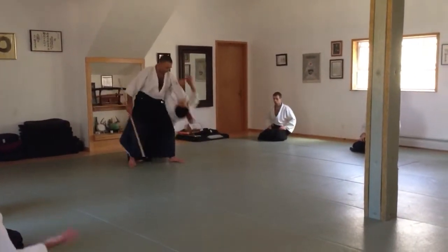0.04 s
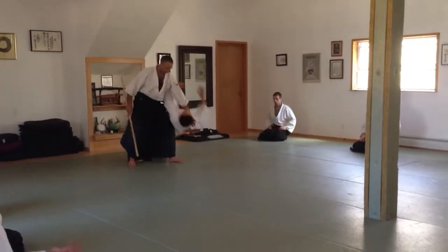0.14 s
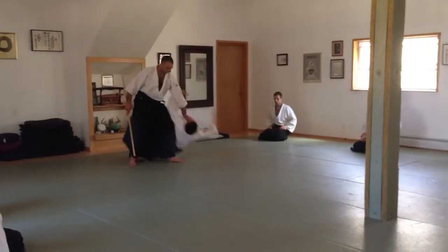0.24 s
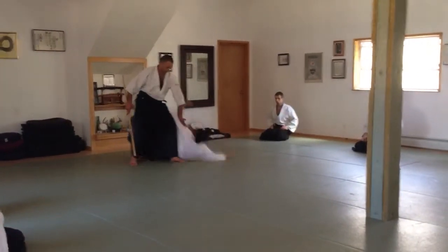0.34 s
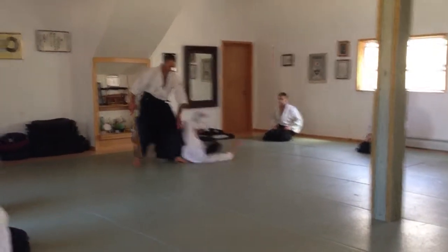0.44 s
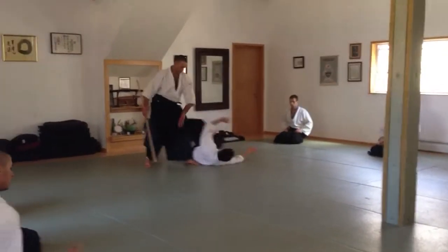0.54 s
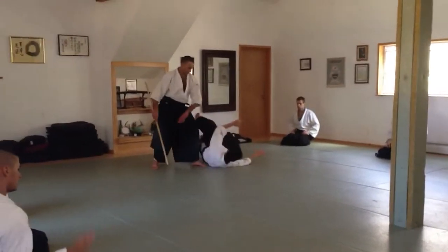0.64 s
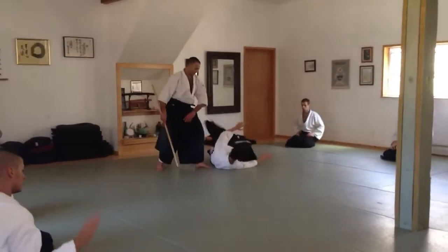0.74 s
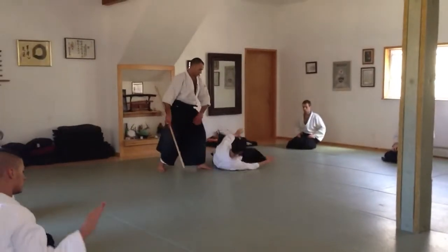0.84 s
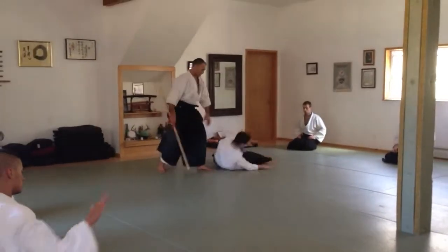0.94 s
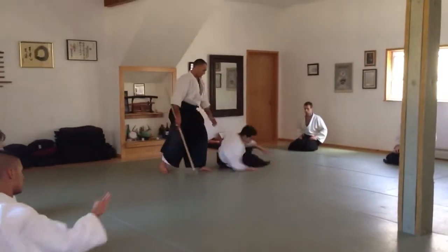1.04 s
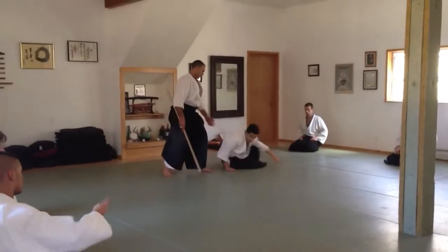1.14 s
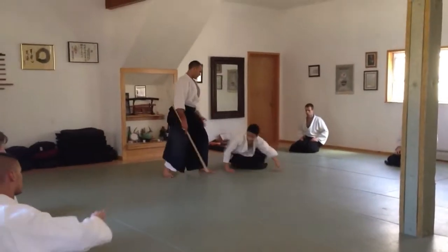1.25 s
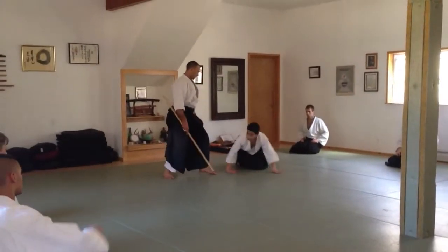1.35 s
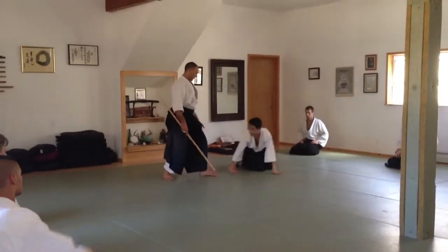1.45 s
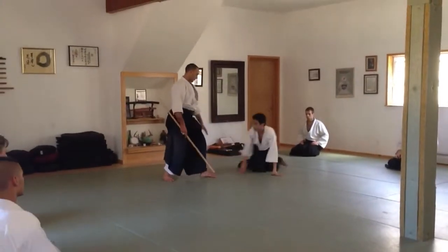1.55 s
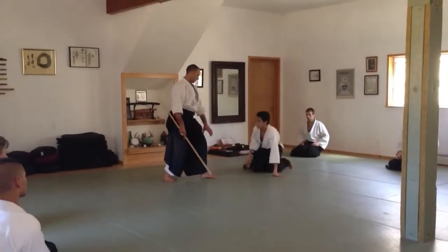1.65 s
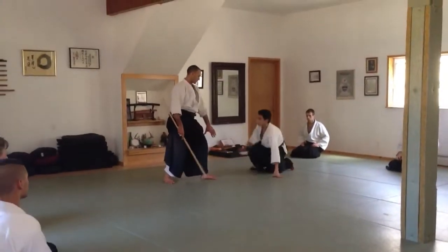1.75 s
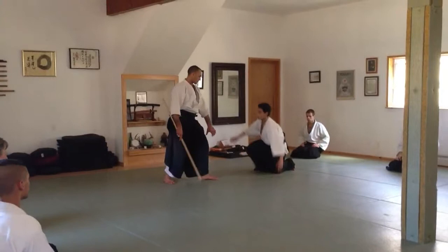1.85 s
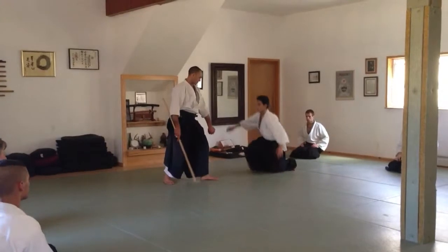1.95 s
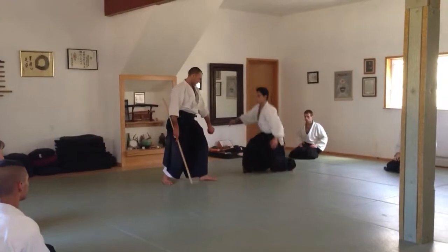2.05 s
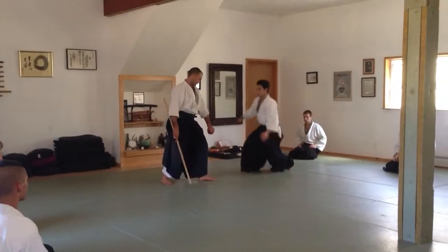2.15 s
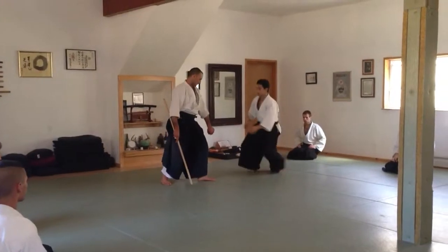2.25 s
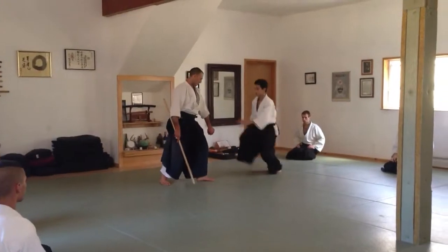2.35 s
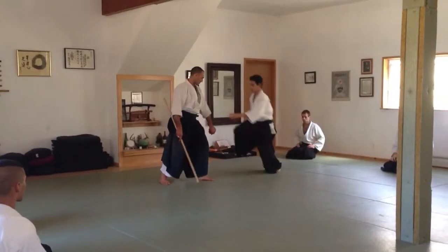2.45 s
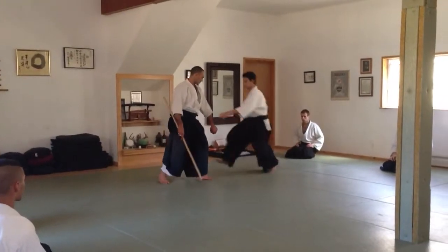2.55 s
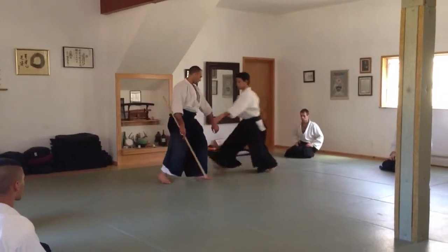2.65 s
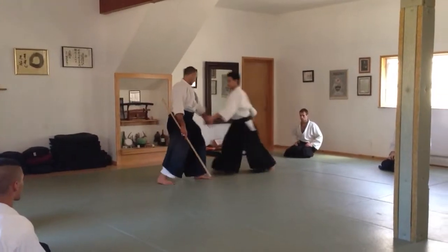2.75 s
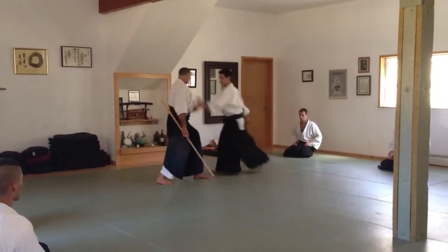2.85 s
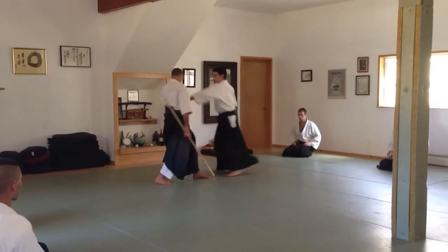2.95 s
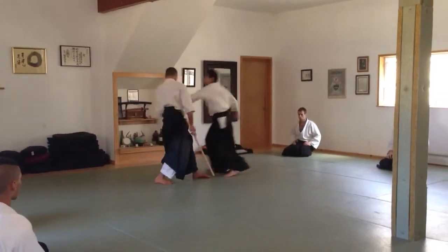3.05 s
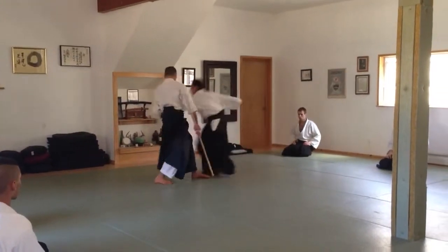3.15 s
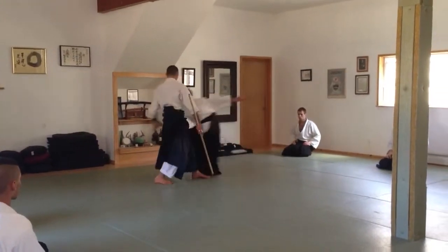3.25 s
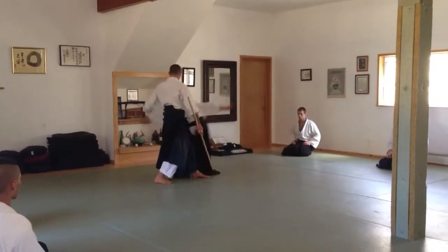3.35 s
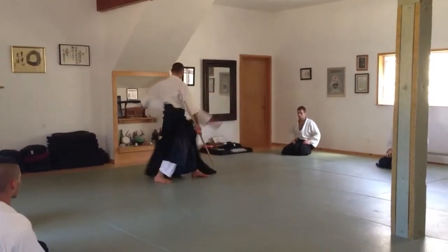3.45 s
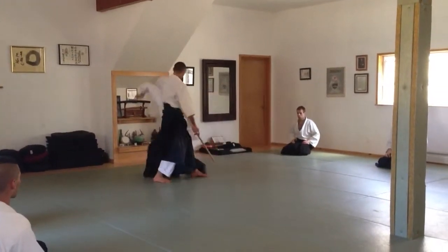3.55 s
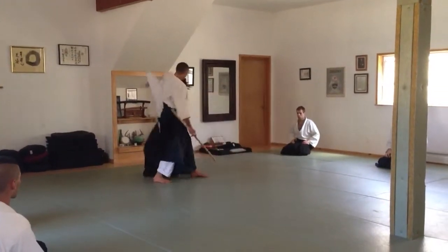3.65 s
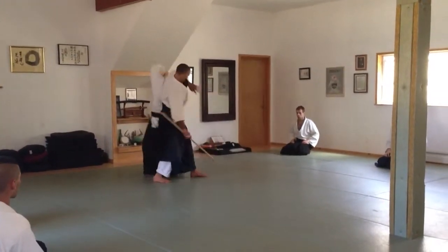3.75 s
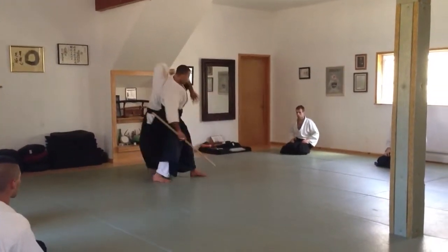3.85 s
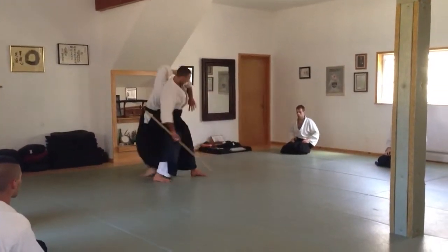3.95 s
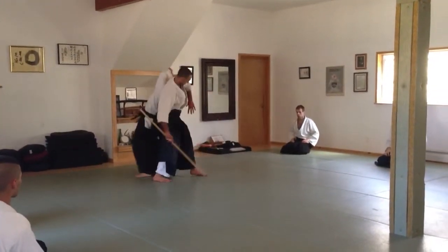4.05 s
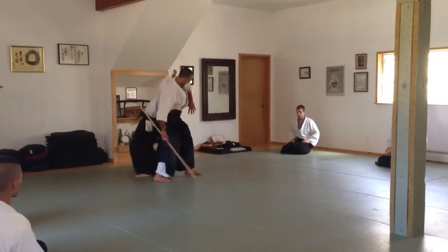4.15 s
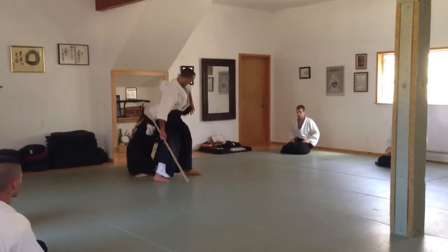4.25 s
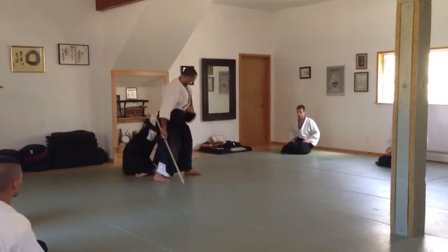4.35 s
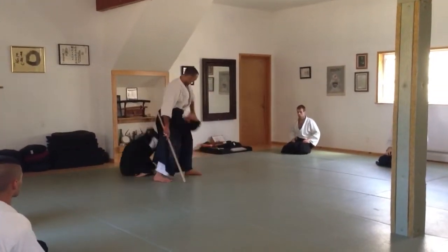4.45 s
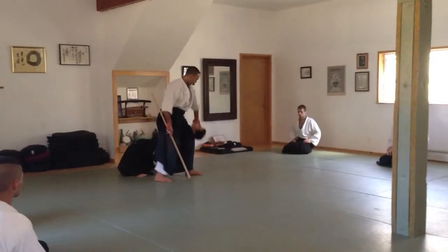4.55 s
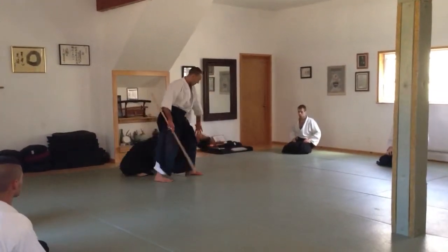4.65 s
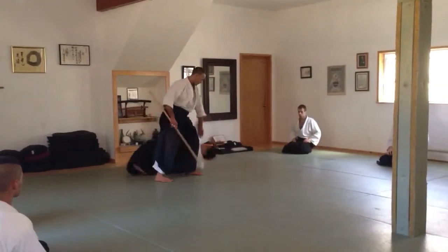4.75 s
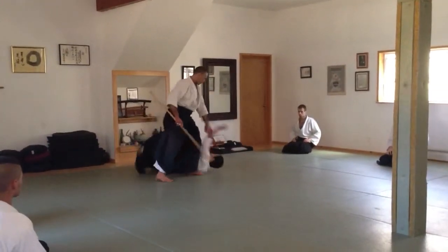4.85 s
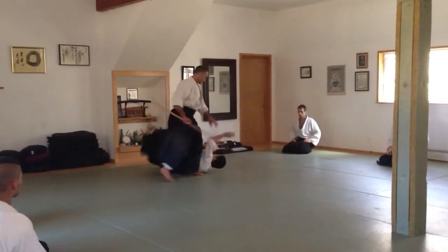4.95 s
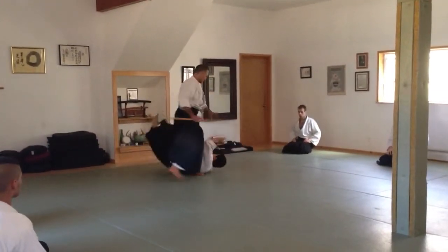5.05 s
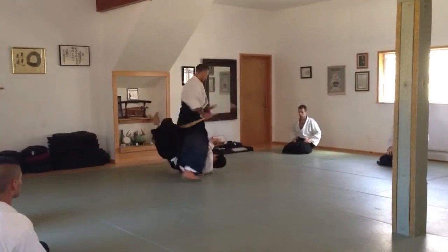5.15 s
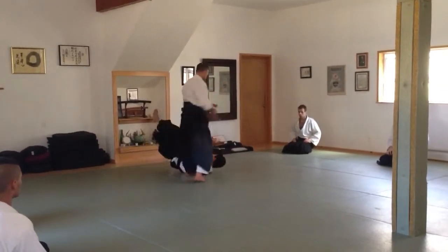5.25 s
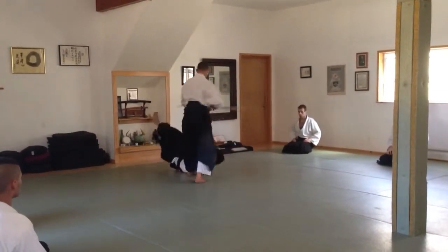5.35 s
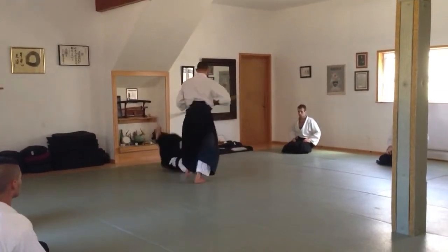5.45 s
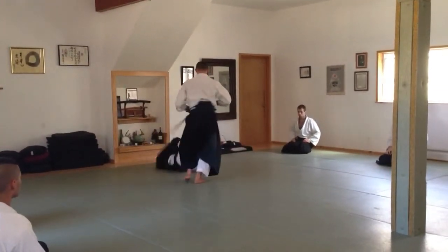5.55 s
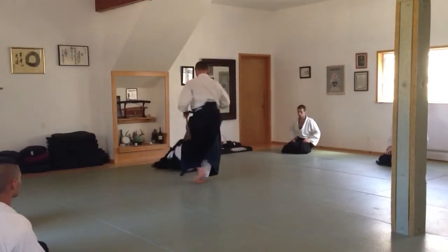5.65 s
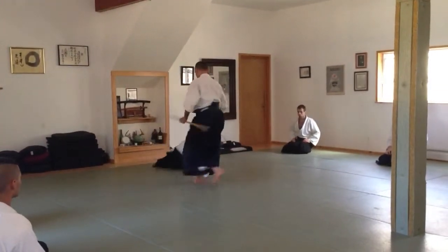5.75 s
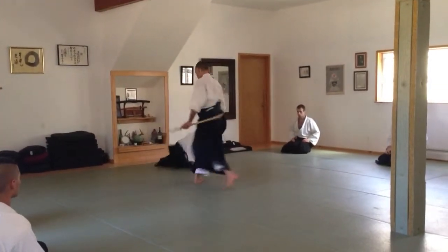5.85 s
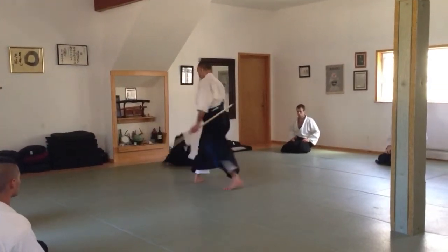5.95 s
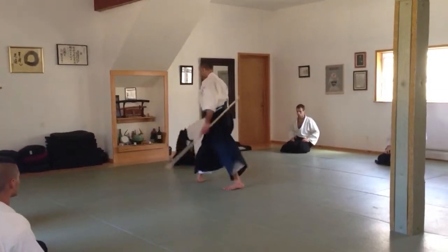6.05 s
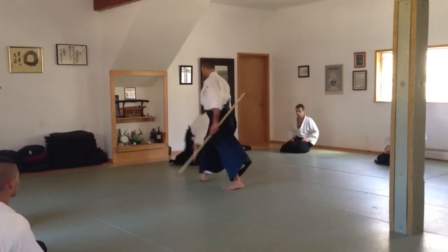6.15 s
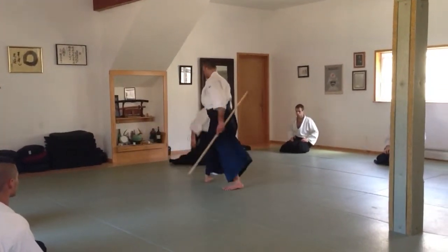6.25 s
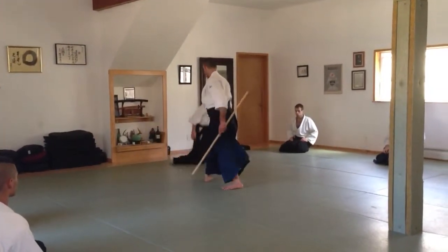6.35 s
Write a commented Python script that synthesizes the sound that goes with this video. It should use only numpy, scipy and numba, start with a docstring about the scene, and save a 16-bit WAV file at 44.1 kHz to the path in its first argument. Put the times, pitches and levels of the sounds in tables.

```python
"""Heavy cotton rustles in a small, bare training hall; then a body lands on the mats, the first of three falls.
Limbs and trunk strike one after another: noise bursts slap the vinyl, decaying modes boom the wooden floor.
Between falls bare feet step (softer thuds and pats) and slide (narrow hiss), and hems flick (swelling grains).
Band-wise echoes and ringing pitches make the hall, over quiet air and a faint hum.
The recorder ducks after loud falls."""
import sys
import numpy as np
from scipy import signal
from scipy.fft import rfft, irfft, next_fast_len
from scipy.io import wavfile
from numba import njit

SR = 44100
rng = np.random.default_rng(int(sys.argv[2]) if len(sys.argv) > 2 else 0)


def unload_audio(sound):
    """Save the sound as a 16-bit wav file, at the path given as the first command line argument."""
    columns = np.transpose(np.atleast_2d(sound))
    # keep every value between -1 and 1, then stretch to whole-number steps
    steps = np.round(np.clip(columns, -1, 1) * 32767)
    wavfile.write(sys.argv[1], SR, steps.astype(np.int16))


N = 281799
T = np.arange(N) / SR


def undb(db):
    """Decibels to gain."""
    return 10 ** (np.asarray(db) / 20)


def unit(x):
    """Scale to rms 1."""
    return x / np.sqrt(np.mean(x ** 2))


def at_hz(points, hz):
    """Read (Hz, value) points on a log-frequency axis."""
    point_hz, value = np.transpose(points)
    return np.interp(np.log(np.maximum(hz, 1)), np.log(point_hz), value)


def colour(x, points, tilt_db_per_oct=0):
    """Causal minimum-phase filter of unit power with the given spectrum, tilted about 1.5 kHz."""
    size = 2 * next_fast_len(len(x))
    hz = np.maximum(np.fft.rfftfreq(size, 1 / SR), 20)
    octaves = np.log2(np.maximum(hz / 1500, 1 / 8))
    gain = unit(undb(at_hz(points, hz) + tilt_db_per_oct * octaves))
    # folding the cepstrum makes the filter causal
    cepstrum = irfft(np.log(gain))
    cepstrum[1:size // 2] *= 2
    cepstrum[size // 2 + 1:] = 0
    response = np.exp(rfft(cepstrum))
    return irfft(rfft(x, size) * response)[:len(x)]


def add(out, start_s, x):
    """Mix x into out at start_s."""
    i = max(int(start_s * SR), 0)
    out[i:i + len(x)] += x[:len(out) - i]


def walk(rate_hz):
    """Random wander with a spread near 1: straight lines between rate_hz random points per second."""
    return np.interp(T * rate_hz, np.arange(N), rng.standard_normal(N))


def grains(size, spread_db):
    """Dense tiny clicks of very unequal strength: creases of cloth, skin peeling off vinyl."""
    sign, strength = rng.standard_normal((2, size))
    return unit(sign * undb(spread_db * strength))


def swell(peak_s, rise_s, fall_s):
    """Envelope that grows to 1 at peak_s and dies away."""
    return np.exp(-np.maximum((peak_s - T) / rise_s, (T - peak_s) / fall_s))


def resonance(x, hz, width_hz):
    """One band-pass resonance."""
    return signal.lfilter(*signal.iirpeak(hz, hz / width_hz, fs=SR), x)


def fade(x, time_s):
    """Running average that forgets in time_s."""
    keep = np.exp(-1 / (time_s * SR))
    return signal.lfilter([1 - keep], [1, -keep], x)


# Modes of the sprung floor under the mats. Each row: pitch in Hz, relative level in dB, t60 in s.
FLOOR_MODES = [(54.4, -16.5, .15), (84, -8.5, 0.37), (108.2, -15, 0.06), (144, -21.5, 0.048),
               (176.4, -7, 0.4), (200.2, 7, 0.072), (227.9, -4.5, 0.25), (237.3, -3.5, 0.37),
               (266.5, -4.5, 0.15), (282, -10, 0.18), (321.4, 1, 0.3), (367, -13, 0.059), (439, -4, 0.074),
               (530, -5.5, 0.082), (690, -16.5, .08)]


def thud(pitch_hz, focus_db_per_oct, contact_s, detune=0.043):
    """A padded push rings the floor; the weight bouncing on the mat favours the modes near its own pitch."""
    t = T[:SR // 3]
    hz, db, t60_s = np.transpose(FLOOR_MODES)[:, :, None]
    db = db - focus_db_per_oct * np.abs(np.log2(hz / pitch_hz))
    hz = hz * (1 + detune * rng.standard_normal(hz.shape))  # each spot of the floor rings a little differently
    decay = np.exp(-np.log(1000) * t / t60_s)
    ring = np.sum(undb(db) * np.cos(2 * np.pi * hz * t) * decay, axis=0)
    push = t * np.exp(-t / contact_s)
    return signal.fftconvolve(ring, push / push.sum())[:len(t)]


# Spectrum of skin and cloth on vinyl. Each row: frequency in Hz, relative level in dB.
SLAP_SPECTRUM = [(80, -26.5), (250, 12), (550, 3.5), (850, 0.5), (1150, -1.5), (1550, -1), (2400, -6),
                 (3000, -9.5), (3900, -5), (5500, -11), (8000, -15.5), (11000, -24), (15000, -38.5)]


def slap(fall_s, tilt_db_per_oct, spread_db=4):
    """Skin and cloth meet the vinyl in a short crackling burst."""
    t = T[:SR // 4]
    burst = grains(len(t), spread_db) * np.exp(-t / fall_s)
    return colour(burst, SLAP_SPECTRUM, tilt_db_per_oct)


def pop(hz, width_hz, fall_s):
    """Air squeezed from under a limb or sole gives a hollow knock, scaled to peak 1."""
    t = T[:SR // 4]
    puff = rng.standard_normal(len(t)) * np.exp(-t / fall_s)
    knock = resonance(resonance(puff, hz, width_hz), hz, width_hz)
    return knock / np.abs(knock).max()


# Parts of the body landing. Each row: start in s, relative thud level in dB, relative slap level in dB,
# slap die-away in s, crack pitch in Hz.
BLOWS = [(0.442, -32, -26, 0.011, 1490), (0.449, -15, -2, 0.0039, 6500), (0.452, 4.5, -2.5, 0.012, 1400),
         (0.469, 2, 0, 0.023, 2600), (0.497, 1, -9.5, 0.019, 1500), (0.519, -10.5, -3, .008, 1490),
         (0.552, 3, -13, 0.013, 2600), (3.438, -16.5, -20.5, 0.01, 1700), (3.451, -14, -14.5, 0.009, 3050),
         (3.466, -14, -15, 0.0055, 5000), (3.489, -20, -32, .005, 5250), (4.837, -18.5, -14.5, .005, 2200),
         (4.844, 0.5, -2.5, 0.0084, 930), (4.853, -3.5, 3.5, 0.0073, 3800), (4.862, 1, 0, 0.019, 1950),
         (4.895, 1.5, -8, 0.041, 4040), (4.942, -10, -13, 0.023, 2140), (5.068, -19.5, -18.5, 0.015, 2200)]
# The three landings. Each row: time in s, thud pitch in Hz, pop pitch in Hz,
# slap tilt at that time in dB per octave.
FALLS = [(0.449, 287.5, 519, 0.13), (3.438, 227.5, 584, 2.5), (4.844, 194.3, 603, 0)]
# limbs slap first, the padded trunk follows: the tilt sinks through a landing
DULLING_DB_PER_OCT_PER_S = 16.5
POP_DB = -13  # re the mean of a blow's thud and slap table levels


def falls(crack_db=4, crack_q=5):
    """Each part of the body thumps the floor, slaps the mat with a pitched crack and squeezes out a pop of air."""
    thuds, slaps = np.zeros((2, N))
    for start_s, thud_db, slap_db, fall_s, crack_hz in BLOWS:
        landing_s, thud_hz, pop_hz, first_tilt = min(FALLS, key=lambda fall: abs(fall[0] - start_s))
        smack = slap(fall_s, first_tilt - DULLING_DB_PER_OCT_PER_S * (start_s - landing_s))
        crack = resonance(smack, crack_hz, crack_hz / crack_q)
        smack = smack + undb(crack_db) * crack
        thump = thud(thud_hz, focus_db_per_oct=7.5, contact_s=0.00047)
        air = pop(pop_hz, width_hz=235, fall_s=0.013)
        add(thuds, start_s, undb(thud_db - 11.5) * thump)
        add(slaps, start_s, undb(slap_db - 9.0) * smack)
        add(slaps, start_s, undb((thud_db + slap_db) / 2 + POP_DB) * air)
    return thuds, slaps


# Footfalls and knees. Each row: start in s, relative thud level in dB, relative sole pat level in dB.
STEPS = [(0.418, -43, -30), (0.427, -29, -25.5), (1.255, -34.5, -55), (2.183, -44.5, -49),
         (2.338, -31, -40), (2.361, -30, -41.5), (2.416, -40.5, -43), (2.597, -36, -40),
         (2.626, -36, -34.5), (2.66, -42, -64), (2.794, -39, -44), (3.098, -36, -60), (3.239, -39.5, -41.5),
         (3.282, -33.5, -51), (4.142, -37.5, -66), (4.259, -39, -60), (4.304, -25, -59), (4.375, -33, -58),
         (5.769, -39, -43.5), (6.341, -39.5, -42.5)]
# a flat sole thuds at STEP_HZ; the more the heel's thud outweighs the pat, the deeper it goes
STEP_HZ, HEEL_HZ, HEEL_SPAN_DB = 270, 178, 7.5


def footsteps():
    """Bare feet push the same floor more slowly, with a dull pat and a small puff of air from under the sole."""
    out = np.zeros(N)
    for start_s, thud_db, pat_db in STEPS:
        thud_hz = np.interp(thud_db - pat_db, [0, HEEL_SPAN_DB], [STEP_HZ, HEEL_HZ])
        add(out, start_s, undb(thud_db - 2.0) * thud(thud_hz, focus_db_per_oct=20.0, contact_s=0.0013))
        add(out, start_s, undb(pat_db - 6.0) * slap(fall_s=0.018, tilt_db_per_oct=-4.5))
        add(out, start_s, undb(pat_db - 8.5) * pop(hz=470, width_hz=480, fall_s=0.021))
    return out


# Soles sliding on vinyl. Each row: peak time in s, relative level in dB, swell in s, die-away in s,
# centre in Hz, width in Hz.
SLIDES = [(1.164, -49.5, .008, .008, 2040, 600), (1.245, -47.5, 0.059, 0.026, 4940, 5880),
          (1.257, -37.5, 0.0028, 0.016, 4740, 1100), (5.869, -49.5, 0.021, 0.078, 5200, 1230)]


def slides():
    """A sole skids over the vinyl grain with a narrow, uneven hiss."""
    out = 0
    for peak_s, db, rise_s, fall_s, hz, width_hz in SLIDES:
        hiss = resonance(resonance(grains(N, spread_db=3), hz, width_hz), hz, width_hz)
        out = out + unit(hiss) * undb(db - 5) * swell(peak_s, rise_s, fall_s)
    return out * undb(2 * walk(120))


# How much the uniforms move. Each row: time in s, relative rustle level in dB.
MOTION = [(0, -48.5), (.2, -55.5), (.38, -56), (1.5, -58.5), (1.78, -57), (2.0, -64.5), (2.25, -60),
          (3.7, -50.5), (3.95, -62.5), (4.5, -54), (5.3, -52), (5.6, -55.5), (6.25, -58.5)]
# Spectrum of the rustle. Each row: frequency in Hz, relative level in dB.
COTTON_SPECTRUM = [(100, -1), (220, 6.5), (550, 5.5), (1000, -2), (1900, -2), (3000, -13), (5000, -10.5),
                   (9000, -23), (15000, -27)]
# Flicks of hems and sleeves. Each row: peak time in s, relative level in dB, swell in s, die-away in s.
FLICKS = [(0.143, -45, .004, 0.065), (1.24, -46, 0.021, 0.052), (1.707, -54, .003, 0.05),
          (2.333, -57, .005, 0.011), (2.610, -55, 0.0098, 0.026), (2.665, -51, 0.0067, 0.043),
          (2.803, -52.5, 0.02, 0.029), (3.066, -47.5, 0.011, 0.031), (3.230, -53.5, 0.048, 0.035),
          (3.783, -48.5, .042, 0.13), (4.062, -45, 0.013, 0.051), (4.304, -49.5, 0.063, 0.065),
          (5.815, -53, 0.018, .07), (6.302, -51, .014, 0.28)]
# Spectrum of the flicks. Each row: frequency in Hz, relative level in dB.
FLICK_SPECTRUM = [(300, -12), (1500, 2.5), (4000, 2), (7000, -1), (10000, -3.5), (15000, -17)]
# the legs swing the cloth around each footfall
STRIDE_DB, STRIDE_SWELL_S, STRIDE_FADE_S = -68.5, 0.037, 0.025


def cloth():
    """Heavy cotton rustles with every move and stride, and hems flick over the mat."""
    folds_db = 2.2 * walk(25)
    strides = undb(STRIDE_DB) * sum(swell(step[0], STRIDE_SWELL_S, STRIDE_FADE_S) for step in STEPS)
    motion = undb(np.interp(T, *np.transpose(MOTION)) - 4.5) + strides
    rustle = colour(grains(N, spread_db=5.0), COTTON_SPECTRUM) * motion * undb(folds_db)
    envelope = sum(undb(db - 5.5) * swell(peak_s, rise_s, fall_s) for peak_s, db, rise_s, fall_s in FLICKS)
    flicks = colour(grains(N, spread_db=1.5), FLICK_SPECTRUM) * envelope * undb(2 * walk(90))
    return rustle + flicks


# Ring of the hall. Each row: frequency in Hz, t60 in s.
HALL_T60 = [(60, 0.33), (140, 0.24), (250, .75), (400, 0.52), (600, 0.56), (1000, 0.59), (1600, 0.72),
            (2400, 0.61), (3000, 0.61), (3900, 0.66), (5500, 0.59), (7500, 0.53), (11000, 0.29),
            (15000, 0.25)]


def hall(x, build_s=0.00046):
    """Diffuse echoes from many contact spots: each third-octave stores the energy fed to it and lets it leak away."""
    out = 0
    edges_hz = np.geomspace(40, 16000, 27)
    for low_hz, high_hz in zip(edges_hz, edges_hz[1:]):
        band = signal.butter(2, [low_hz, high_hz], "bandpass", fs=SR, output="sos")
        t60_s = at_hz(HALL_T60, np.sqrt(low_hz * high_hz))
        power = signal.sosfilt(band, x + 1e-9 * T) ** 2  # the tiny ramp avoids exact silence
        energy = fade(fade(power, build_s), t60_s / np.log(10 ** 6))
        noise = unit(signal.sosfilt(band, rng.standard_normal(N)))
        out = out + np.sqrt(energy) * noise
    return out


# Pitches that the hall favours. Each row: pitch in Hz, width in Hz, relative level in dB.
HALL_PEAKS = [(215.4, 87, -8.5), (336, 31, -4), (457, 34, -7), (600.6, 13, -1.5), (640, 8.3, -3.5),
              (977, 14, -4), (1170, 10, -6), (1483, 55, -7.5), (2270, 33, -2), (2597, 100, -3),
              (3700, 180, -7.5)]


def favoured_pitches(echoes):
    """Parallel bare walls favour some pitches of the echoes."""
    return sum(undb(db) * resonance(echoes, hz, width_hz) for hz, width_hz, db in HALL_PEAKS)


# Standing waves between the walls. Each row: pitch in Hz, relative level in dB, t60 in s.
STANDING = [(162, -6, .8), (216, -0.5, 0.59), (277, 1.5, 0.57), (328, -1, 0.7), (463, -2, 0.57),
            (640, 5, 0.72), (693, 0, 0.51), (922, -3.5, 0.89), (1173, -3.5, 0.85), (1480, 6.5, 0.93),
            (2242, 2.5, 0.94), (2556, 5.5, .8), (3610, 5, .75)]


def standing_waves(x):
    """Single pitches ring on between parallel walls after each landing."""
    return sum(undb(db) * resonance(x, hz, np.log(1000) / (np.pi * t60_s)) for hz, db, t60_s in STANDING)


# Spectrum of still air and microphone hiss. Each row: frequency in Hz, relative level in dB.
QUIET_SPECTRUM = [(15, -51.5), (25, -17.5), (109, -8.5), (146, -6), (191, -2.5), (237, -2.5), (344, -16.5),
                  (383, -11), (529, -22), (673, -23), (1540, -14.5), (1910, -18), (2560, -17),
                  (15000, -25.5)]
AIR_DB, HUM_HZ, HUM_DB = -63, 118, -70.5  # mean levels, rms


def room_tone():
    """Still air, microphone hiss and a faint wavering hum: coloured noise and a sine."""
    air = unit(colour(rng.standard_normal(N), QUIET_SPECTRUM)) * undb(AIR_DB + 0.4 * walk(2.4))
    hum = unit(np.sin(2 * np.pi * HUM_HZ * T)) * undb(HUM_DB + 1.5 * walk(9))
    return air + hum


def scene():
    """Everything in the hall, on one channel; the small microphone hardly picks up the floor's deepest boom."""
    thuds, slaps = falls()
    steps = footsteps()
    friction = cloth() + slides()
    echoes = hall(undb(-5.5) * thuds + undb(0.1) * slaps + undb(-2.5) * steps + undb(-5.5) * friction)
    echoes = echoes + favoured_pitches(echoes)
    heard = thuds + slaps + steps + friction + echoes + standing_waves(thuds + slaps)
    thin = signal.sosfilt(signal.butter(2, 120, "highpass", fs=SR, output="sos"), heard)
    return (thin + room_tone())[None]


@njit
def follow(x, attack_s, release_s):
    """Level follower: quick to rise, slow to fall."""
    out, level = np.empty(len(x)), 0.
    for i in range(len(x)):
        time_s = attack_s if abs(x[i]) > level else release_s
        level += (abs(x[i]) - level) / (SR * time_s)
        out[i] = level
    return out


TOP_HZ = 15400


def record(dry, threshold_db=-16, slope=0.56):
    """Gain control ducks after loud falls, the peaks are rounded and the top is cut."""
    level = follow(dry[0], attack_s=0.014, release_s=0.51)
    ducked = dry * np.minimum(1, undb(threshold_db) / (level + 1e-9)) ** slope
    rounded = 0.71 * np.tanh(ducked / 0.83)
    return signal.sosfilt(signal.ellip(10, .2, 80, TOP_HZ, fs=SR, output="sos"), rounded)


dry = scene()
out = record(dry)
unload_audio(out)
```